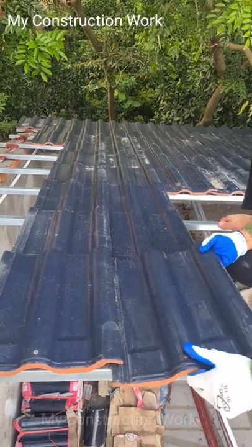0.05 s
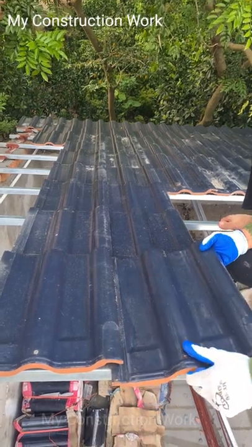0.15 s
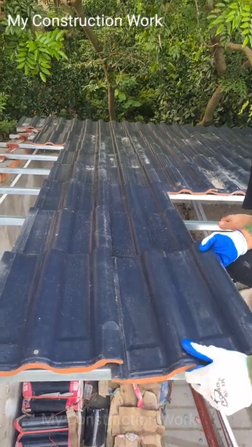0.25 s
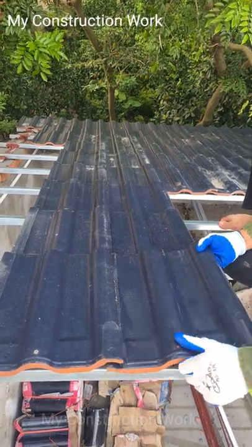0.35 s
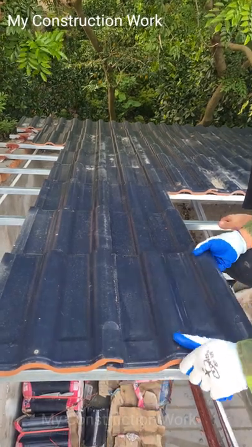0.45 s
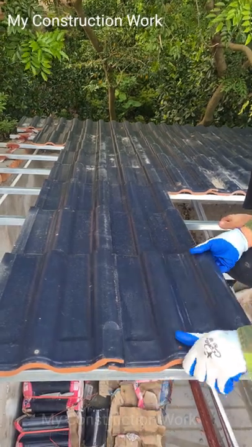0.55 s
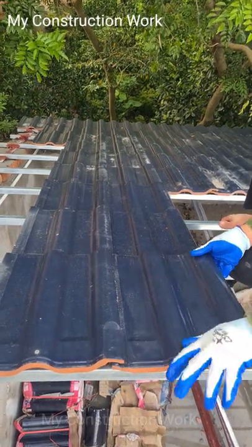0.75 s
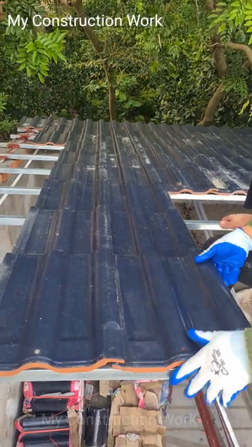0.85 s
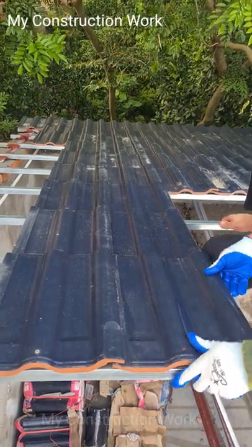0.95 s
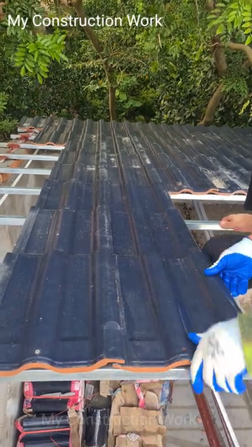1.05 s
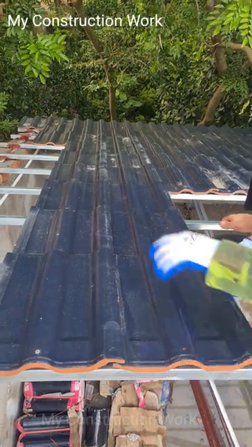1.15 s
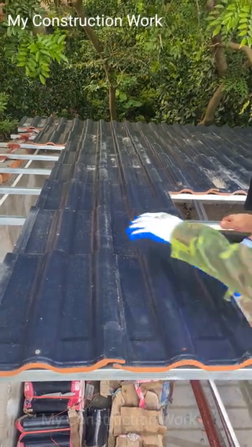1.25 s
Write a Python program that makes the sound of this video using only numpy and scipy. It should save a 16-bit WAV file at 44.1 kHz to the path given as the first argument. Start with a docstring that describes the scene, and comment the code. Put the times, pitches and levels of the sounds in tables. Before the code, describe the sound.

A clay roof tile clinks, scrapes and knocks into place outdoors.

```python
"""On an open roof, a stereo pair of microphones an arm's length from a glazed clay tile being laid.
Held free, the tile clinks against its neighbours and scrapes over their ribs; it knocks down onto
the batten, then clacks as it settles into the overlap. Each contact rings the tile's modes and sets
the tiles around it clattering; the scrape is a stream of tiny slips of clay on clay.
The roof answers briefly. Behind it lie a faint outdoor hush and light wind on the microphones."""
import sys
import numpy as np
from scipy import signal
from scipy.fft import rfft, irfft, next_fast_len
from scipy.io import wavfile
from scipy.ndimage import map_coordinates

SR = 44100
rng = np.random.default_rng(int(sys.argv[2]) if len(sys.argv) > 2 else 0)


def bounce(signal):
    """Save signal as a 16-bit WAV file at the path given by the first command-line argument."""
    frames = np.transpose(np.atleast_2d(signal))
    limited = np.clip(frames, -1, 1)
    pcm = np.round(limited * 32767).astype(np.int16)
    wavfile.write(sys.argv[1], SR, pcm)


N = 57330

# Spectra of the hush, the wind, the scrape's hiss and the neighbours' clatter: f/Hz, relative level/dB
HUSH_SPECTRUM = [(15, -67), (25, -8.5), (116, -5.5), (240, -14), (421, -11), (560, -28.5), (826, -23),
                 (1490, -44), (3000, -44.5), (8810, -45.5), (15500, -52.5)]
WIND_SPECTRUM = [(20, -35), (50, -7.5), (95, -0.5), (170, -18.5), (500, -33), (2000, -100)]
HISS_SPECTRUM = [(300, -43), (1200, 10), (2200, 6.5), (3100, 2), (4000, -1.5), (6500, -15), (12000, -16.5),
                 (15500, -26)]
CLATTER_SPECTRUM = [(170, -6.5), (380, -5.5), (750, 4), (1150, 3.5), (1600, -3), (2300, -9.5), (3100, -6.5),
                    (3700, -20.5), (6000, -26.5), (9000, -31), (14500, -40.5)]
# How alike the two microphones hear each source: f/Hz, coherence/0-1
HUSH_COHERENCE = [(40, 1), (120, 1), (400, 0.69), (2000, 0.21), (8000, 0.077)]
WIND_COHERENCE = [(50, 0.78), (130, 0.85)]
TILE_COHERENCE = [(200, 1), (700, 0.87), (1500, 0.6), (3000, 0.12), (6000, 0.05), (15000, 0.072)]
# Gusts on the microphones: t/s, level/dB
GUSTS = [(0, -53), (.52, -76), (.615, -46.5), (.68, -59), (.8, -59), (.85, -44), (.88, -56.5), (1.3, -60.5)]
# Left microphone's lag as the tile moves in from the right to the middle: t/s, delay/ms
LEFT_LAG = [(.25, 0.36), (.36, 0.37), (.47, 0.12), (.58, 0.42), (.72, 0.3), (.79, 0.06), (1.02, 0.071)]
# Course of the slide: t/s, rasp level/dB, hiss level/dB
SLIDE_LEVELS = [(0, -78, -69.5), (.1, -64, -63.5), (.21, -68, -60.5), (.26, -39, -48.5), (.325, -45, -54),
                (.39, -44.5, -47), (.44, -39, -48), (.475, -43.5, -46), (.51, -42.5, -55.5),
                (.56, -40.5, -53), (.6, -52, -52), (.675, -61, -57), (.70, -53, -41.5), (.78, -42, -56),
                (.83, -61.5, -76), (.92, -63, -59), (.965, -38.5, -38.5), (1.01, -35, -55),
                (1.06, -41.5, -77), (1.15, -59, -69), (1.3, -70.5, -71.5)]
# Resonances of tiles rubbing together: f/Hz, width/Hz, relative level/dB
RUB_RESONANCES = [(264, 105, -8.5), (381, 63, -3.5), (622, 208, -2), (729, 140, 3), (846, 102, 2),
                  (1160, 215, -3), (1360, 210, -4), (1910, 350, -18.5), (2770, 170, -17.5)]
# Edges of the clatter's bass, middle, presence and treble bands: f/Hz
CLATTER_EDGES = [170, 550, 1500, 3500, 16000]
# Decay of the clatter in each band: t60/s
CLATTER_DECAYS = [0.11, 0.099, .1, 0.093]
# Modes of the tile, by how it is supported or where it is touched: f/Hz, relative level/dB, t60/s
FREE_MODES = [(735, 1.5, 0.29), (1613, 0.5, 0.31), (2051, -21, 0.44), (2070, -20.5, 0.64), (2483, -7, 0.21),
              (3800, -22.5, 0.29), (3980, -10, 0.12), (4160, -13, 0.056), (4580, -16, 0.12),
              (5667, -10.5, 0.061), (6370, -17.5, 0.074), (8180, -21.5, 0.04)]  # held free; the close pair beats and lingers
RIB_MODES = [(364.4, -3.5, 0.1), (809, -2, 0.094), (1154, 3.5, 0.042), (1723, -5.5, 0.071),
             (3040, -11.5, 0.037)]  # riding on its neighbour's rib
BATTEN_MODES = [(73, -15.5, 0.15), (210, -19.5, 0.042), (424, 3, 0.12), (580.4, 0, 0.11), (714, 10, 0.021),
                (888, -10.5, 0.087), (970, -7.5, 0.075), (1365, -8, 0.096), (2415, -12, 0.08),
                (2860, -19, 0.056), (3053, -6, 0.066), (3190, -9, 0.035)]  # bearing on the batten
OVERLAP_MODES = [(227.3, -5.5, 0.17), (386, -0.5, 0.065), (540.6, -10, 0.13), (730, 6, 0.1),
                 (815, -2, 0.17), (1124.6, 4.5, 0.084), (1323, -2.5, 0.14), (1723, -2.5, 0.16),
                 (2020, 0.5, 0.05), (2313, -9.5, 0.13), (3163, -6, 0.091), (4580, -11.5, 0.061)]  # lying in the overlap
LIP_MODES = [(1260, 11, 0.064), (2080, 14.5, 0.058), (2872, 14.5, 0.089), (8600, -17, 0.073)]  # its thin lip
# Contacts: t/s, ring level/dB, ring tilt/dB per octave, strike point/0-1 along the tile,
# clatter level/dB in each of the four bands, left minus right/dB
FREE_CLINKS = [(.2215, -42, 6, .18, -47, -33, -34, -45.5, 1.5),
               (.2255, -25, -21, 0.19, -36.5, -23, -36, -40, -6),
               (.2545, -33, -9, 0.2, -44, -23.5, -34, -45, -3.5), (.271, -45, 0, .2, -46, -35, -36, -53, 0),
               (.5765, -29, 0, 0, -58, -64, -39, -44.5, -1)]
RIB_BUMPS = [(.428, -40, -1, 0.28, -44, -40, -40, -56, -4),
             (.461, -37.5, -9, 0.097, -37, -39, -35.5, -47, 0),
             (.473, -40, -6.5, 0.056, -44, -40, -43, -47.5, -4),
             (.4895, -26.5, 2, 0.4, -38, -46, -43, -60, 1.5), (.526, -30, 0, 0.28, -47, -45, -42, -54, 0)]
BATTEN_KNOCKS = [(.7145, -30, -2.5, 0, -42, -38, -40, -65, -3),
                 (.7178, -22, -1.5, 0.009, -31, -36, -32, -41, -4.5),
                 (.7235, -28.5, -0.5, 0.014, -33, -36, -32, -50, 2.5),
                 (.733, -51, -5, 0.13, -29.5, -27, -38, -60, -2)]
OVERLAP_CLACKS = [(.3405, -36.5, 4.5, 0.23, -67, -34, -39.5, -57.5, -2.2),
                  (.9585, -28, -2, 0.33, -34, -31, -32.5, -45.5, 0.71),
                  (.990, -33, -2, .17, -39, -33.5, -50, -46, -2),
                  (1.018, -25, -2, 0.366, -35.5, -39, -58, -66, -2.3),
                  (1.081, -43, -6, 0.35, -58, -56, -71, -73, -0.38)]
GRIT_TICKS = [(.109, -65, 0.5, 0.076, -53, -55, -59.5, -61, 0.89),
              (.683, -54, 2, .5, -73, -56, -46, -47, 0), (.772, -51, 4.5, 0.2, -70, -34.5, -36, -44, 0),
              (.936, -54, 0, 0.58, -69, -58, -44, -54.5, 0.82),
              (1.119, -53, -4, 0.39, -53, -59, -49.5, -52.5, 0)]  # grit snapping under the lip; the row at .772 s is the tile rebounding after its knock onto the batten


def amp(db):
    """Decibels to gain."""
    return 10 ** (np.asarray(db) / 20)


def unit(x):
    """Scaled to rms 1."""
    return x / np.sqrt(np.mean(x ** 2) + 1e-20)


def along(points, hz):
    """Reads (f/Hz, value) points on a log frequency axis."""
    freqs, values = np.transpose(points)
    return np.interp(np.log(hz + 1), np.log(freqs + 1), values)


def curves(rows):
    """One value per sample for each column after the time."""
    times, *columns = np.transpose(rows)
    return [np.interp(np.arange(N) / SR, times, column) for column in columns]


def filtered(x, response):
    """x through a filter given as gain against frequency."""
    n = x.shape[-1]
    padded = next_fast_len(n + 8192)
    return irfft(rfft(x, padded) * response(np.fft.rfftfreq(padded, 1 / SR)), padded)[..., :n]


def decay(t, attack_s, t60):
    """A quick rise and an exponential fall."""
    return (1 - np.exp(-t / attack_s)) * np.exp(-np.log(1000) * t / t60)


def add(out, start_s, sound):
    """Mixes a stereo sound in at start_s."""
    part = out[:, max(round(start_s * SR), 0):][:, :sound.shape[1]]
    part += sound[:, :part.shape[1]]


def panned(db):
    """Gains at the two microphones, the left db above the right."""
    return amp(np.array([[db], [-db]]) / 2)


def lags(at_s):
    """Arrival offsets in seconds at the left and right microphone, for the tile at time at_s."""
    return np.array([[.5], [-.5]]) * np.interp(at_s, *np.transpose(LEFT_LAG)) / 1000


def stereo(pair, colour, coherence, delay_s=0):
    """Two unrelated signals, as mid and side, become a coloured, partly alike pair of rms 1."""
    width = lambda hz: np.arccos(np.clip(along(coherence, hz), -1, 1)) / 2
    mid, side = filtered(pair, lambda hz: colour(hz) * np.array([np.cos(width(hz)), np.sin(width(hz))]))
    left_right = np.array([mid + side, mid - side])
    return unit(filtered(left_right, lambda hz: np.exp(-2j * np.pi * hz * delay_s)))


def hush(level_db=-52):
    """The open air all round: faint, steady noise."""
    air = stereo(rng.standard_normal((2, N)), lambda f: amp(along(HUSH_SPECTRUM, f)), HUSH_COHERENCE)
    return amp(level_db) * panned(-1.5) * air


def wind():
    """Light gusts rumble, mostly on the right microphone."""
    gust_db, = curves(GUSTS)
    rumble = stereo(rng.standard_normal((2, N)), lambda f: amp(along(WIND_SPECTRUM, f)), WIND_COHERENCE)
    return amp(gust_db) * panned(-15) * rumble


def roof(x, level_db=-12.5):
    """A short diffuse answer from the surrounding tiles and rafters."""
    tail = rng.standard_normal((2, SR // 3)) * decay(np.arange(SR // 3) / SR, attack_s=0.0037, t60=0.18)
    return amp(level_db) * signal.fftconvolve(x, tail / np.linalg.norm(tail[0]), axes=1)[:, :N]


def ceramic(x, ripple_db=4, spacing_hz=110, corner_hz=1500):
    """The stack's crowded upper resonances: each contact meets its own peaks and dips."""
    hz = np.fft.rfftfreq(SR // 10, 1 / SR)
    knots = rng.standard_normal(int(hz[-1] / spacing_hz) + 2)
    db = ripple_db * map_coordinates(knots, [hz / spacing_hz]) * hz ** 2 / (hz ** 2 + corner_hz ** 2)
    cepstrum = irfft(np.log(amp(db)))
    causal = np.arange(len(cepstrum)) < len(cepstrum) // 2  # minimum phase: no ring before the contact
    answer = irfft(np.exp(rfft(2 * cepstrum * causal)))
    return signal.fftconvolve(x, answer[None], axes=1)[:, :N]


def clatter(at_s, band_db):
    """The neighbouring tiles rattle: countless small modes dying together, in four bands of noise."""
    t = np.arange(SR // 3) / SR
    out = np.zeros((2, len(t)))
    for lo, hi, db, t60 in zip(CLATTER_EDGES, CLATTER_EDGES[1:], band_db, CLATTER_DECAYS):
        skirts = lambda f: np.sqrt((1 + (lo / (f + 1)) ** 12) * (1 + (f / hi) ** 12))
        band = lambda f: amp(along(CLATTER_SPECTRUM, f)) / skirts(f)
        noise = stereo(rng.standard_normal(out.shape), band, TILE_COHERENCE, lags(at_s))
        envelope = decay(t, attack_s=0.00067, t60=t60)
        out += amp(db) * unit(noise * envelope) * np.sqrt(np.mean(envelope ** 2))
    return ceramic(out)


def slips(per_s=1100, spread_db=3.5):
    """Tiny slips of uneven size at random moments."""
    slipping = rng.random((2, N)) < per_s / SR
    return slipping * rng.standard_normal((2, N)) * amp(spread_db * rng.standard_normal((2, N)))


def scrape(judder_depth_db=2, judder_per_s=110):
    """Clay slides on clay in a judder: slips excite the tiles' resonances and hiss at the contact."""
    rasp_db, hiss_db = curves(SLIDE_LEVELS)
    knots = rng.standard_normal(N // 50)
    judder_db = judder_depth_db * map_coordinates(knots, [np.arange(N) * judder_per_s / SR])
    body = lambda f: sum((-1) ** k * amp(db) * 1j * f * width / (hz * hz - f * f + 1j * f * width)
                         for k, (hz, width, db) in enumerate(RUB_RESONANCES))
    rasp = stereo(slips(), body, TILE_COHERENCE, lags(at_s=0.474))
    friction = 0.44 * unit(slips()) + 0.5 * rng.standard_normal((2, N))
    hiss = stereo(friction, lambda f: amp(along(HISS_SPECTRUM, f)), TILE_COHERENCE, lags(at_s=0.483))
    return ceramic(amp(judder_db + rasp_db) * rasp + amp(judder_db / 2 + hiss_db) * hiss)


def glove(t, hz, grip_s, t60=0.033, corner_hz=1200):
    """From grip_s on, the glove damps the tile's low modes."""
    return np.exp(-np.log(1000) * np.maximum(t - grip_s, 0) / t60 / (1 + (hz / corner_hz) ** 4))


def contacts(rows, modes, rise_s, grip_s=np.inf, node_db=12):
    """The tile's ring builds up over rise_s while the edges touch, and its neighbours clatter."""
    out = np.zeros((2, N))
    for at_s, ring_db, tilt_db, point, *band_db, pan_db in rows:
        t = np.maximum(np.arange(SR // 3) / SR - lags(at_s), 0)
        for k, (hz, mode_db, t60) in enumerate(modes):
            octaves = np.log2(hz / FREE_MODES[0][0])
            near_node = np.sin(np.pi * (k + 1) * point) ** 2  # a mode struck at its node is weaker
            level_db = ring_db + mode_db + tilt_db * octaves - node_db * near_node
            envelope = decay(t, rise_s, t60) * glove(t, hz, grip_s)
            wave = (-1) ** k * np.sqrt(2) * np.sin(2 * np.pi * hz * t)
            add(out, at_s, amp(level_db) * panned(pan_db) * envelope * wave)
        add(out, at_s, panned(pan_db) * clatter(at_s, band_db))
    return out


def scene():
    """The tile close up, the roof around it and the open air behind."""
    tile = (contacts(FREE_CLINKS, FREE_MODES, rise_s=0.001, grip_s=0.063)
            + contacts(RIB_BUMPS, RIB_MODES, rise_s=0.001)
            + contacts(BATTEN_KNOCKS, BATTEN_MODES, rise_s=0.0026)
            + contacts(OVERLAP_CLACKS, OVERLAP_MODES, rise_s=0.0034)
            + contacts(GRIT_TICKS, LIP_MODES, rise_s=0.0024)
            + scrape())
    return tile + roof(tile) + hush() + wind()


def record(dry):
    """Both channels are cut off above 15720 Hz."""
    return filtered(dry, lambda hz: hz < 15720)


dry = scene()
out = record(dry)
bounce(out)
```